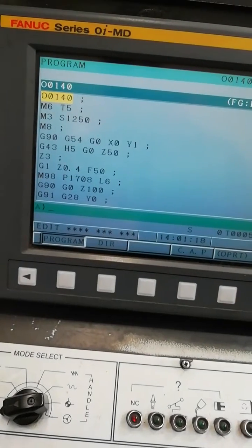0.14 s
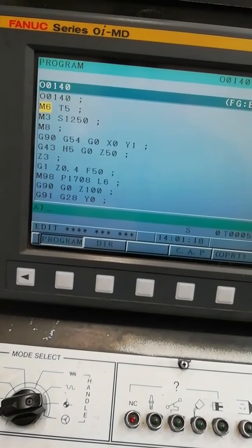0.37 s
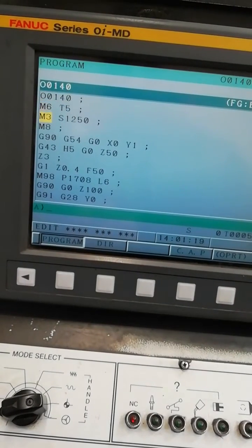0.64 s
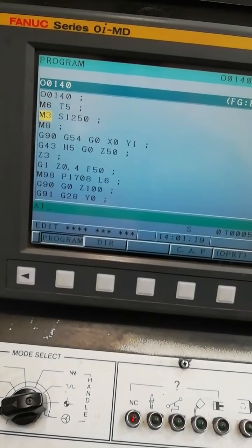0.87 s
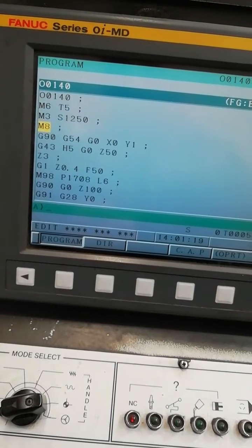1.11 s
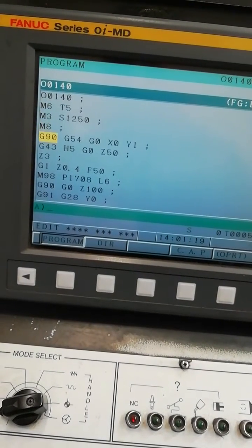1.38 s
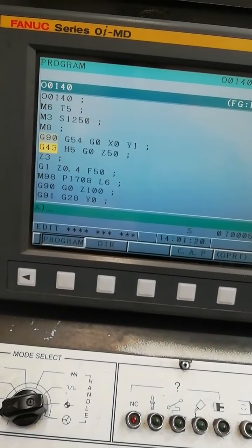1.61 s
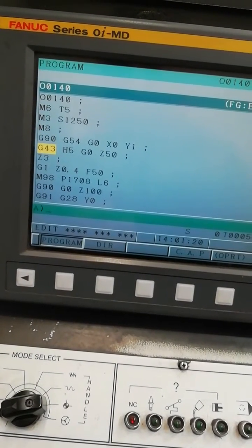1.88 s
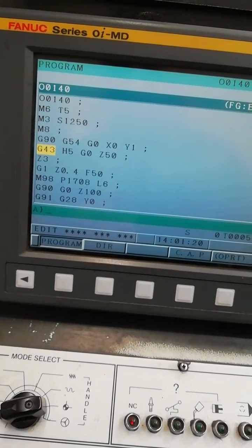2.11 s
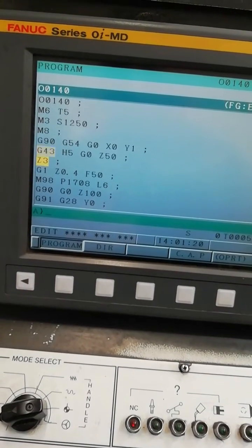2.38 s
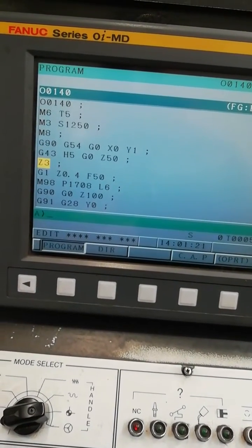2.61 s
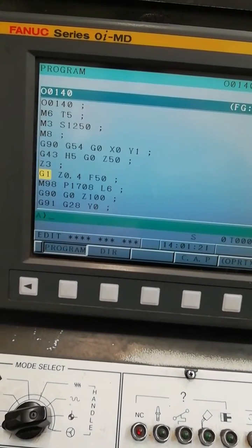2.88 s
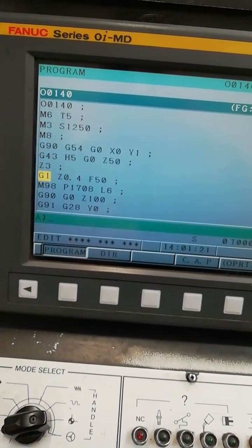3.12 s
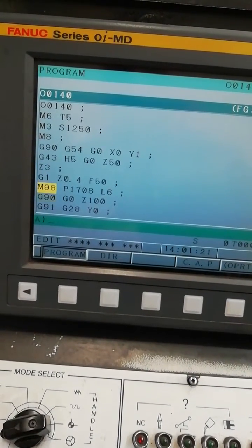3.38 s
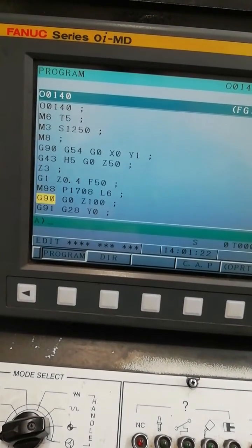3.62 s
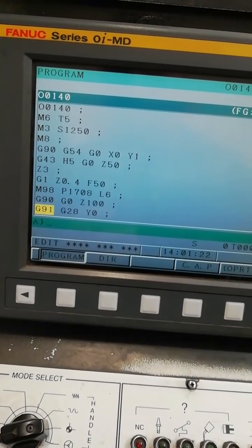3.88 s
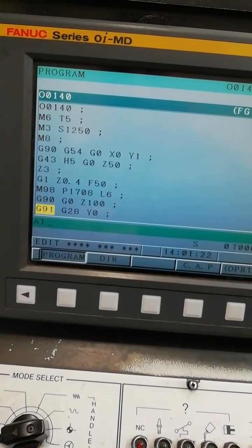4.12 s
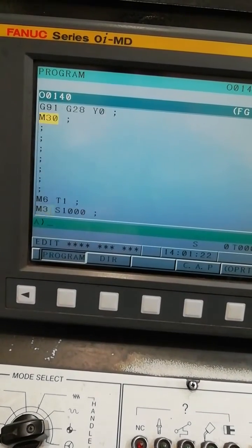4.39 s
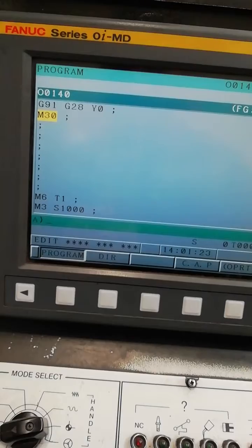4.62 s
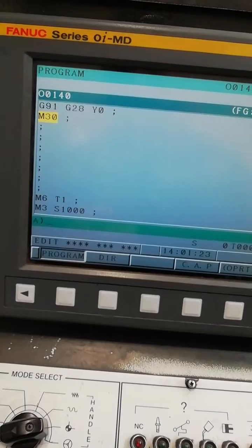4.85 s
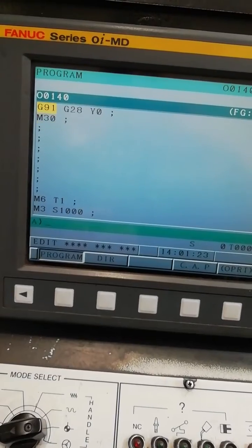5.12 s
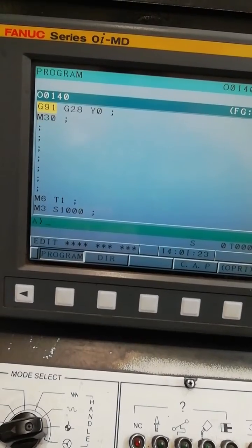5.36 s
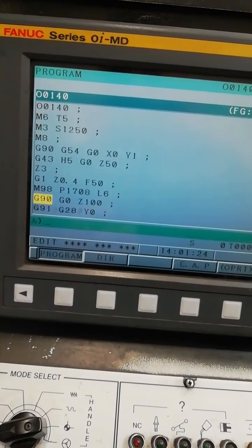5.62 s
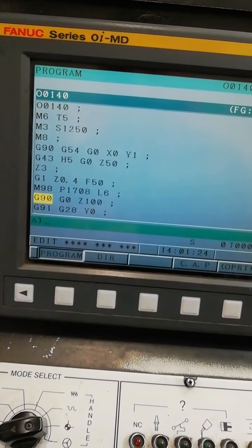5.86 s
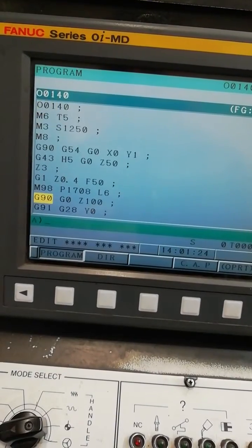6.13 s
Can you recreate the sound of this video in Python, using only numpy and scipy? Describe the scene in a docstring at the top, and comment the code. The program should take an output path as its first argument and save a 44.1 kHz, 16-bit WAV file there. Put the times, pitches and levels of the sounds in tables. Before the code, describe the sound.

An air gun hisses loudly over metal parts in a reverberant workshop, pauses briefly, blasts again and stops, leaving low machine hum and faint squeaky chirps.

```python
"""An air gun blows over metal parts in a workshop, lets go briefly, blows again and stops; a hand-held phone hears it.
Its jet is shaped noise: it hisses at the nozzle and at edges, roars on flat faces and whistles in pockets.
Late on something squeaks in quick chirps, and something rustles softly far off.
The hall rings as decaying noise. Behind it all two motors beat as pure tones, mains parts hum on wavering tones,
a drive whines and fans rush as noise from all sides."""
import sys
import numpy as np
from scipy import signal
from scipy.fft import rfft, irfft, next_fast_len
from scipy.io import wavfile
from scipy.ndimage import uniform_filter1d

SR = 44100
rng = np.random.default_rng(int(sys.argv[2]) if len(sys.argv) > 2 else 0)


def output_pcm(signal):
    """Save a mono or channel-first signal as 16-bit PCM at the path in sys.argv[1].

    Samples are clipped to [-1, 1] before scaling.
    """
    pcm = np.clip(np.atleast_2d(signal).T, -1, 1) * 32767
    wavfile.write(sys.argv[1], SR, np.round(pcm).astype(np.int16))


def how_loud(loudness_db):
    """Turn decibels into a plain amplitude multiplier (0 dB gives 1, 20 dB gives 10)."""
    steps = np.asarray(loudness_db, float) / 20
    return 10 ** steps


N = 275314
LEAD = SR  # one extra second ahead of the start, so that the hall already rings
T = (np.arange(N + LEAD) - LEAD) / SR  # seconds
PORT_LAG_S = 26 / SR  # time sound takes along the phone, from the right microphone port to the left

# Trigger pulls. Each row: opens in seconds, lets go in seconds, pressure loss after that in dB per second,
# nozzle hiss level in dB at the opening, hiss level in dB at the letting go.
BLASTS = [(-1, 1.63, 110, -17.5, -21), (1.895, 3.333, 250, -20.5, -20)]


def trigger():
    """Pressure at the nozzle (1 = open) and its hiss: the valve opens fast, the hose bleeds down after."""
    valve_opens_s = .035
    pressure, hiss = 0, 0
    for opens, lets_go, loss_db_per_s, first_db, last_db in BLASTS:
        opening = np.clip((T - opens) / valve_opens_s, 0, 1)
        blast = opening * how_loud(-loss_db_per_s * np.maximum(T - lets_go, 0))
        pressure = pressure + blast
        hiss = hiss + blast * how_loud(np.interp(T, [opens, lets_go], [first_db, last_db]))
    return pressure, hiss


# Tone colour of the nozzle hiss. Each row: frequency in Hz, relative level in dB per Hz.
NOZZLE_COLOUR = [(300, 7), (1000, -21), (2500, -6), (6000, 3), (16000, 0)]


def nozzle_hiss(hiss, flutter):
    """Air rushing out of the nozzle: broad noise that flutters with the turbulence."""
    return hiss * how_loud(flutter) * unit(colour(rng.standard_normal(len(T)), NOZZLE_COLOUR))


# The jet meets a flat face. Each row: start in seconds, end in seconds, roar level in dB before its flutter.
FACES = [(-.3, .15, -32.5), (.45, 1.0, -24.5), (1.0, 1.68, -28.5), (2.25, 2.68, -28.5), (2.77, 2.83, -28.5),
         (3.0, 3.2, -34.5)]
SWEEP_S = 0.06  # time the jet takes to move on and off a face or edge


def face_roar(pressure):
    """Turbulence on a flat face: noise around a wide, low resonance."""
    nothing_near_db = -35.5  # roar while the jet meets nothing near
    level = np.hypot(pressure * how_loud(nothing_near_db), swells(FACES, SWEEP_S))
    return level * how_loud(2.9 * walk(10.33)) * resonant(hz=1200, width_hz=1450)


# The jet crosses an edge. Each row: start in seconds, end in seconds, hiss level in dB before its flutter.
EDGES = [(-.3, .36, -30), (.68, .9, -28), (1.28, 1.43, -19), (1.5, 1.56, -19.5), (1.56, 1.7, -24),
         (2.33, 2.46, -21.5), (2.46, 2.78, -21.5), (2.8, 2.86, -22), (2.9, 3.02, -24), (3.06, 3.3, -30)]


def edge_hiss(pressure, flutter):
    """Air torn at an edge: noise around a wide, high resonance."""
    nothing_near_db = -34.5  # edge hiss while the jet meets nothing near
    level = np.hypot(pressure * how_loud(nothing_near_db), swells(EDGES, SWEEP_S))
    return level * how_loud(flutter) * resonant(hz=4460, width_hz=2400)


# The jet crosses a pocket and blows its resonance. Each row: start in seconds, end in seconds,
# pitch in Hz at full pressure, width of the resonance in Hz, level in dB.
POCKETS = [(-.3, .13, 901, 450, -33.5), (0.478, 0.947, 879, 397, -31), (0.598, 0.937, 1553, 500, -34),
           (1.294, 1.702, 1903, 926, -32.5), (1.397, 1.795, 2643, 610, -25), (1.948, 2.278, 828, 600, -35),
           (2.265, 2.598, 699, 300, -30.5), (0.507, 1.087, 2202, 1200, -35), (2.566, 2.68, 1570, 80, -32),
           (2.58, 2.84, 1347, 60, -34.5), (2.996, 3.3, 624, 40, -35), (3.032, 3.22, 889, 90, -38)]


def pocket_whistles(pressure):
    """Hollows blown like bottles, whose pitch sags as the pressure falls."""
    sag_per_db = .0045  # share of the pitch lost for each dB of lost pressure
    pressure_db = 20 * np.log10(np.clip(pressure, .1, 1))
    sag = 1 + sag_per_db * pressure_db
    out = 0
    for start, end, hz, width_hz, db in POCKETS:
        out = out + how_loud(db) * gate(start, end) * whistle(hz * sag, width_hz)
    return out


def air_gun():
    """The whole jet: pressure sets the nozzle hiss, the background roar and edge hiss, and the pocket pitch;
    faces, edges and pockets come and go at their own times."""
    pressure, hiss = trigger()
    flutter = 1.1 * walk(12) + .9 * walk(40)  # dB, shared by nozzle and edge hiss
    jet = nozzle_hiss(hiss, flutter) + face_roar(pressure)
    jet = jet + edge_hiss(pressure, flutter) + pocket_whistles(pressure)
    # a thin jet radiates no bass
    return signal.sosfilt(signal.butter(3, 440, "high", fs=SR, output="sos"), jet)


# Stick-slip chirps. Each row: start in seconds, relative level in dB.
SQUEAKS = [(5.689, -40), (5.72, -39), (5.775, -42), (5.815, -48), (5.86, -51)]


def squeak():
    """A rough rubbing squeak with its smeared octave, in quick stick-slip chirps that sink in pitch."""
    start_hz, sag_hz_per_s = 4070, 400
    rise_s, fade_s = .006, .025
    hz = start_hz - sag_hz_per_s * np.clip(T - SQUEAKS[0][0], 0, 1)
    rub = whistle(hz, 230) + how_loud(-13) * whistle(2 * hz, 1100)
    chirps = 0
    for start, db in SQUEAKS:
        since = np.maximum(T - start, 0)
        chirps = chirps + how_loud(db) * np.minimum(since / rise_s, 1) * np.exp(-since / fade_s)
    return rub * chirps


# When it rustles. Each row: start in seconds, end in seconds, level in dB before its flutter.
RUSTLES = [(5.9, 6.0, -40), (6.08, 6.4, -39.5)]
# Tone colour of the rustle. Each row: frequency in Hz, relative level in dB per Hz.
RUSTLE_COLOUR = [(400, -4), (1100, 3.5), (2200, 2), (4500, -6.5), (7000, -25)]


def rustle():
    """A soft broad rush from far off: shaped noise that comes and goes gently."""
    flutter_db = 2 * walk(25)
    rush = unit(colour(rng.standard_normal(len(T)), RUSTLE_COLOUR))
    return swells(RUSTLES, edge=0.074) * how_loud(flutter_db) * rush


# Pitches of the two motors, in Hz.
MOTOR_HZ = (45.30, 41.08)


def motors():
    """Two steady low tones close in pitch, so that they beat about four times a second."""
    in_step_s = 0.18  # a moment when both peak together
    out = 0
    for hz, rms_db in zip(MOTOR_HZ, (-40, -45.5)):
        out = out + np.sqrt(2) * how_loud(rms_db) * np.cos(2 * np.pi * hz * (T - in_step_s))
    return out


# Humming mains parts. Each row: pitch in Hz, rms level in dB before its swells, left minus right level in dB,
# lead of the left over the right in radians, size of the pitch waver in Hz.
HUM = [(97.5, -50, 0, -0.1, .45), (299.7, -40.5, 1, 0.62, 0.1), (322.4, -46.5, -3.5, -0.9, .2),
       (399.6, -55, -10, 1.3, 0.3), (443.5, -56, -3, 1.64, 0.4), (530, -64, 0, 0, 0.24),
       (729, -66.5, 8, 2, 0.32), (898.1, -59.5, 5, 0.9, 2.34), (967.0, -58, 5, -4.3, .3),
       (1062, -66.5, -20, -2.5, 0.74), (1120, -70, -17, -0.3, 0.54), (1300, -61.5, -3, 1.4, 1.66),
       (1930, -60.5, 0, 2.2, 3.2)]


def mains_hum():
    """Tones that waver in pitch and level, each with its own place between left and right."""
    side = np.array([[.5], [-.5]])
    out = 0
    for hz, db, pan_db, lead, waver_hz in HUM:
        phase = 2 * np.pi * (np.cumsum(hz + waver_hz * walk(3)) / SR + rng.random())
        level = how_loud(db + 2.3 * walk(6) + side * pan_db)
        out = out + np.sqrt(2) * level * np.cos(phase + side * lead)
    return out


def drive_whine():
    """A drive's thin high whine, much weaker on the left."""
    left_right_db = np.array([[-84], [-63]])
    return how_loud(left_right_db) * whistle(np.full(len(T), 6060), width_hz=180)


# Tone colour of the fans. Each row: frequency in Hz, relative level in dB per Hz.
FAN_COLOUR = [(25, -24), (60, -6), (105, -3.5), (220, 0), (300, -4), (480, -13), (700, -10), (1000, -13.5),
              (1500, -17), (2500, -22), (5000, -24.5), (7500, -29.5), (10000, -35.5), (15000, -32.5)]


def fans():
    """Moving air all around: shaped noise from all sides with a slight flutter."""
    rush = diffuse(next_fast_len(len(T), True))[:, :len(T)]
    flutter_db = .6 * walk(6)
    return how_loud(-40 + flutter_db) * unit(colour(rush, FAN_COLOUR))


# How alike the two ports hear sound from all around; it swings with the wavelength.
# Each row: frequency in Hz, correlation from -1 to 1.
LIKENESS = [(100, .997), (150, .985), (200, .93), (310, .6), (440, 0), (620, -.72), (800, -.3), (1050, 0),
            (1500, .2), (2100, 0)]


def diffuse(n, end_on=0.047):
    """Noise from all around, plus a share from the right end of the phone that reaches the left port late."""
    hz = np.fft.rfftfreq(n, 1 / SR)
    mid, side, along = rfft(rng.standard_normal((3, n)))
    alike = np.clip(on_log(LIKENESS, hz), -1, 1)
    around = np.sqrt((1 + alike) / 2) * mid + np.sqrt((1 - alike) / 2) * side * [[1], [-1]]
    share = np.clip(end_on * np.minimum(hz / 600, 1), 0, 1)  # less in the bass
    along = along * [np.exp(-2j * np.pi * hz * PORT_LAG_S), np.ones(len(hz))]
    return irfft(np.sqrt(1 - share) * around + np.sqrt(share) * along, n)


# How long the hall rings. Each row: frequency in Hz, time to fall by 60 dB in seconds.
HALL_T60 = [(300, 1.4), (2000, 1.9), (5000, 1.12), (8000, 0.76), (12000, 0.28), (16000, 0.15)]


def tail():
    """The echoes from one spot: dense noise whose treble dies first, scaled to about unit energy."""
    hz, s, echoes = signal.stft(diffuse(1 << 15), SR, nperseg=256)
    t60 = on_log(HALL_T60, hz)[:, None]
    decay = how_loud(-60 * s / t60)
    energy = t60 * SR / np.log(1e6)
    return signal.istft(echoes * decay / np.sqrt(energy), SR, nperseg=256)[1]


def hall(dry, direct_db, count=12, size=SR // 10):
    """A direct path and echoes; the source moves, so the echo pattern changes ten times a second."""
    out = how_loud(direct_db) * np.array([np.roll(dry, int(PORT_LAG_S * SR)), dry])
    turn = np.arange(len(T)) / size
    for spot in range(count):
        # fade smoothly from spot to spot, round and round
        near = np.cos(np.pi / 2 * np.clip((turn - spot) % count - 1, -1, 1))
        out += signal.oaconvolve((near * dry)[None], tail(), axes=1)[:, :len(T)]
    return out


def whistle(hz, width_hz):
    """A narrow resonance whose pitch may move: a tone with random swell and phase, rms 1."""
    keep = np.exp(-np.pi * width_hz / SR)
    two_poles = np.convolve([1, -keep], [1, -keep])
    swell = signal.lfilter([1], two_poles, rng.standard_normal((2, len(T))))
    phase = 2 * np.pi * np.cumsum(hz) / SR
    return unit(swell[0] * np.cos(phase) + swell[1] * np.sin(phase))


def resonant(hz, width_hz):
    """Turbulent noise ringing one resonance, rms 1."""
    return unit(signal.lfilter(*signal.iirpeak(hz, hz / width_hz, SR), rng.standard_normal(len(T))))


def swells(rows, edge):
    """Levels of events that come, hold and go; their powers add."""
    power = 0
    for start, end, db in rows:
        power = power + (how_loud(db) * gate(start - edge / 2, end + edge / 2, edge)) ** 2
    return np.sqrt(power)


def gate(start, end, edge=0.0095):
    """Soft on and off, each taking edge seconds."""
    return np.clip(np.minimum(T - start, end - T) / edge, 0, 1)


def walk(rate):
    """A random wander: values held for 1 / rate seconds, then smoothed twice."""
    k = int(SR / rate)
    steps = np.repeat(rng.standard_normal(len(T) // k + 1), k)
    return uniform_filter1d(uniform_filter1d(steps, k), k)[:len(T)]


def on_log(table, hz):
    """Columns of a table at the given frequencies, joined on a log axis."""
    f, *columns = np.transpose(table)
    return np.squeeze([np.interp(np.log(hz + 1), np.log(f), c) for c in columns])


def colour(x, table):
    """Shape a spectrum by (Hz, dB) points."""
    n = next_fast_len(x.shape[-1])
    gain = how_loud(on_log(table, np.fft.rfftfreq(n, 1 / SR)))
    return irfft(rfft(x, n) * gain, n)[..., :x.shape[-1]]


def unit(x):
    """Scale to rms 1."""
    return x / np.sqrt(np.mean(x ** 2))


def scene():
    """The air gun and the rustle are hidden behind machines; the squeak arrives more directly."""
    hidden = hall(air_gun() + rustle(), direct_db=-10)
    near = how_loud(-6) * hall(squeak(), direct_db=5, count=3)
    machines = motors() + mains_hum() + drive_whine() + fans()
    return (hidden + near + machines)[:, LEAD:]


def gain_control(x):
    """Follows the smoothed power of both ports together and turns loud sound down."""
    knee_db, squeeze, hold_s = -24.5, 0.19, 0.031
    keep = np.exp(-1 / (hold_s * SR))
    power = np.mean(x ** 2, axis=0)
    power = signal.lfilter([1 - keep], [1, -keep], power, zi=[np.mean(power[:SR // 10])])[0]
    return x * (1 + power / how_loud(knee_db) ** 2) ** (-squeeze / 2)


def roll_off(x):
    """The treble ends steeply here."""
    return signal.sosfilt(signal.butter(12, 16150, fs=SR, output="sos"), x)


# Tone colour of the two microphone ports. Each row: frequency in Hz, left gain in dB, right gain in dB.
PORTS = [(1020, 2.5, 2.5), (1930, 4, 4.5), (3130, 6.5, 8), (4630, 3.5, 10), (6630, 6.5, 11),
         (7340, 11.5, 9), (8230, 18, 7), (9300, 13, 3.5), (10440, 1, 3.5), (11900, 0, -3.5),
         (13200, -4.5, 3), (15400, -7, -7.5)]


def record(dry):
    """The phone: each port has its own treble peak, the top is cut and gain control tames the loud jet."""
    x = colour(dry, PORTS)
    x = signal.sosfilt(signal.ellip(8, .2, 60, 15900, fs=SR, output="sos"), x)
    x = gain_control(x)
    # near the end the whole level sinks a little
    sink_s, sink_takes_s, sink_db = 5.88, .15, -1.5
    x = x * how_loud(sink_db * np.clip((T[LEAD:] - sink_s) / sink_takes_s, 0, 1))
    mix = np.clip(x, -1, 1)
    return roll_off(mix)


dry = scene()
out = record(dry)
output_pcm(out)
```